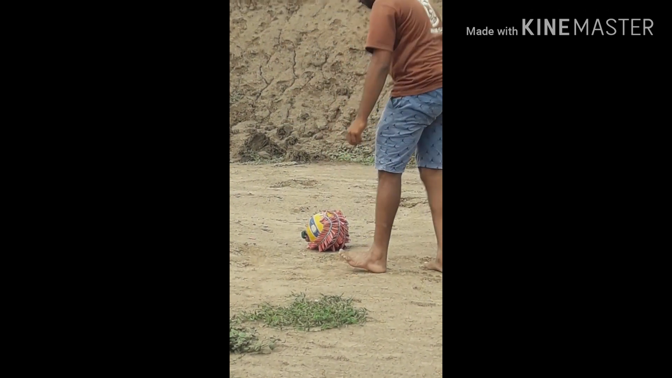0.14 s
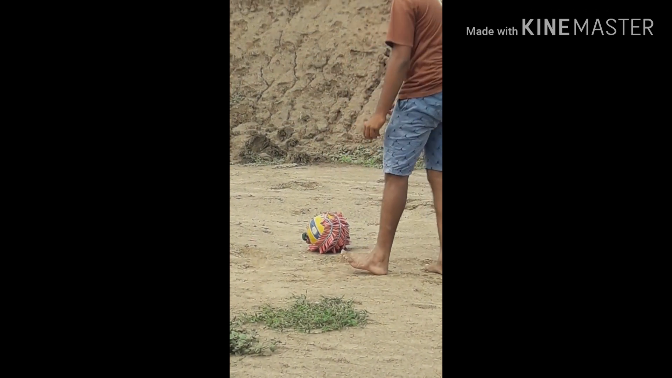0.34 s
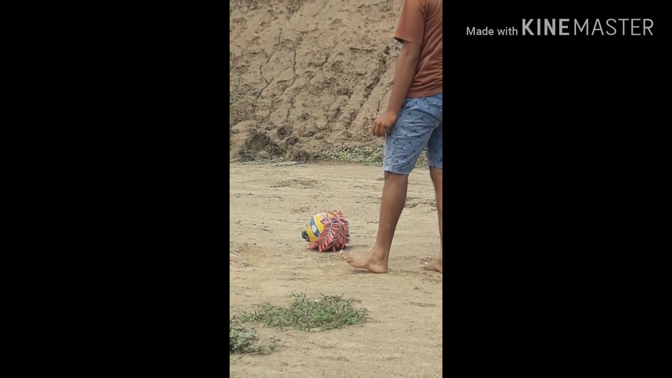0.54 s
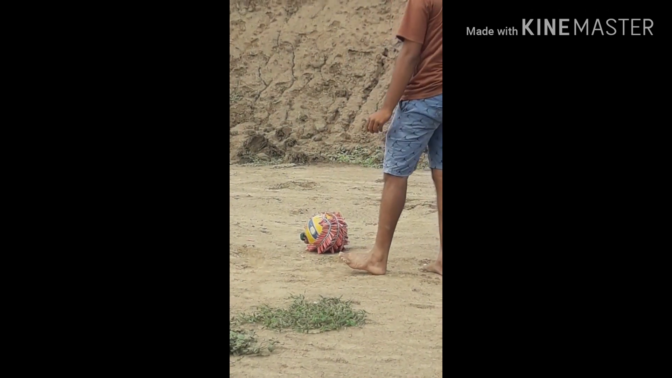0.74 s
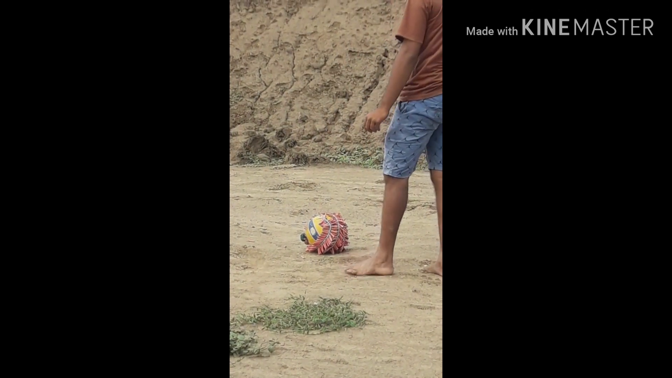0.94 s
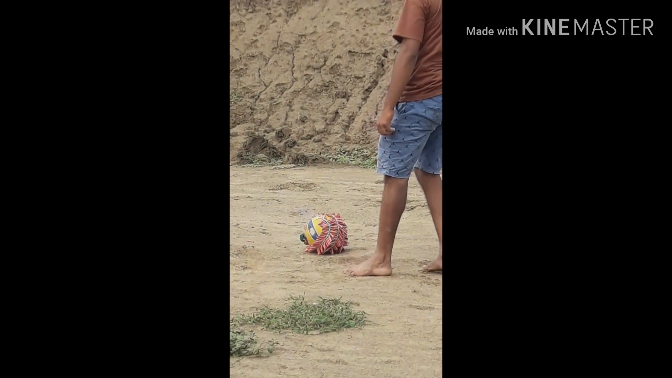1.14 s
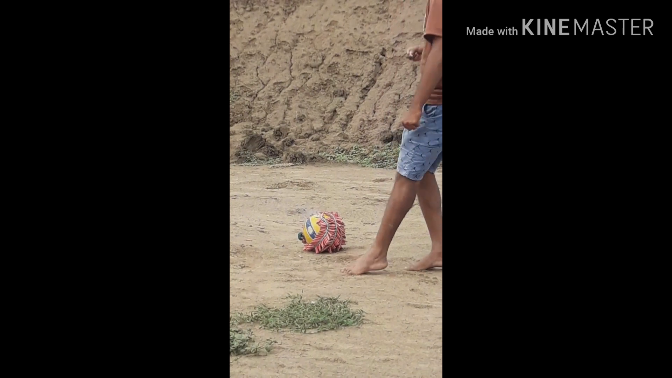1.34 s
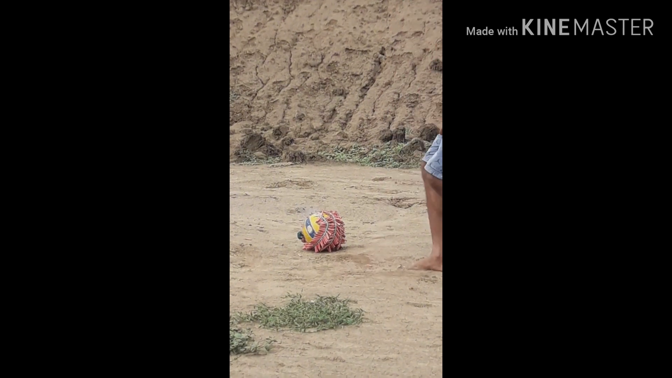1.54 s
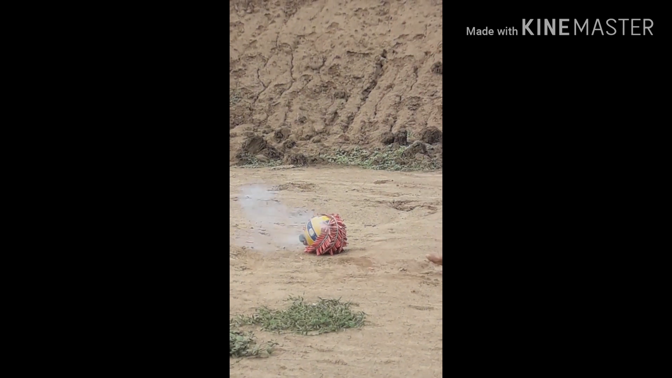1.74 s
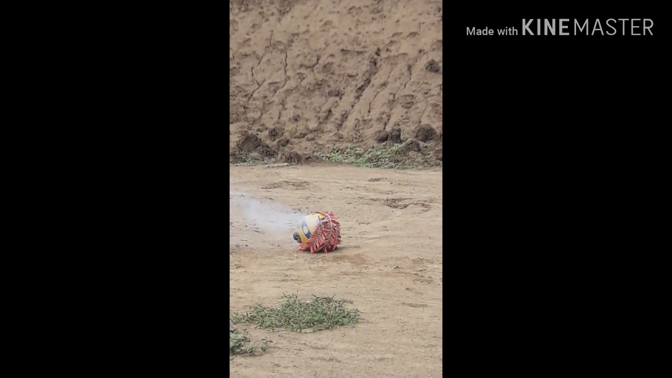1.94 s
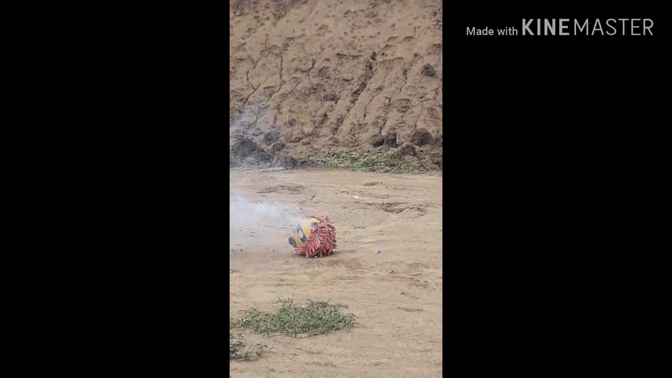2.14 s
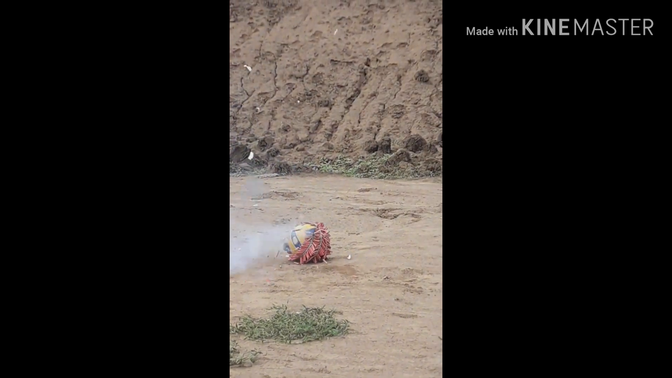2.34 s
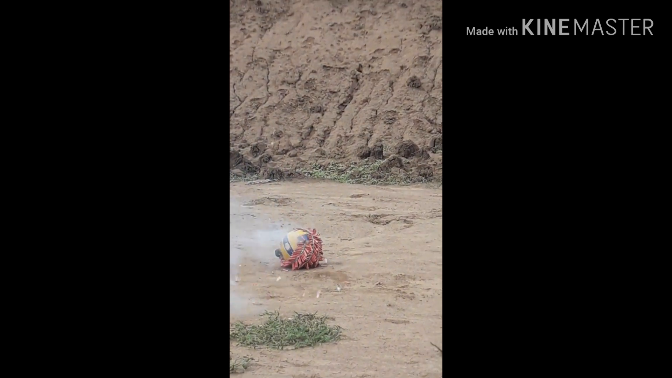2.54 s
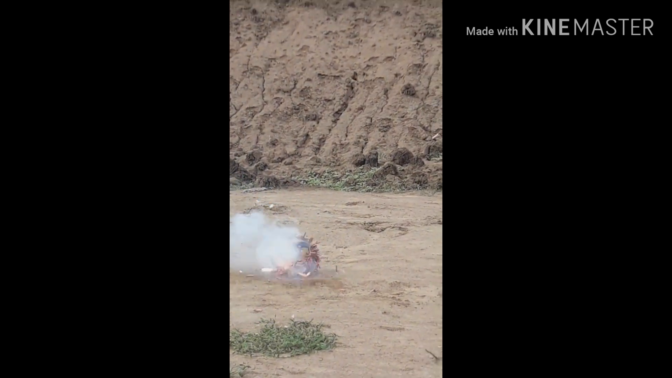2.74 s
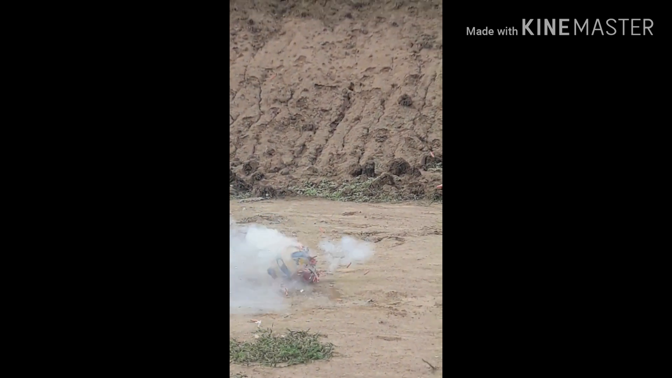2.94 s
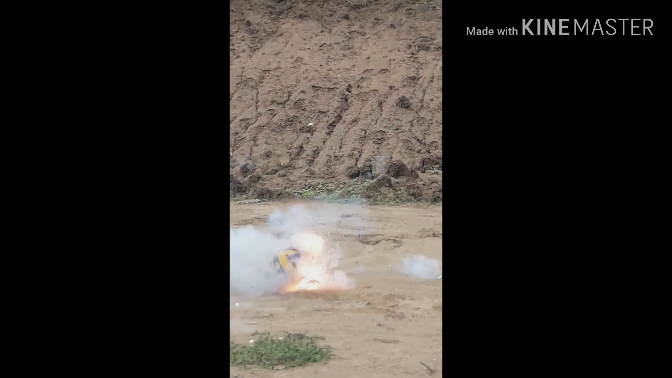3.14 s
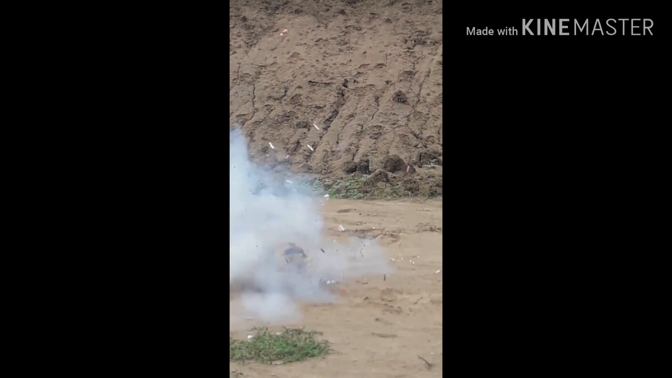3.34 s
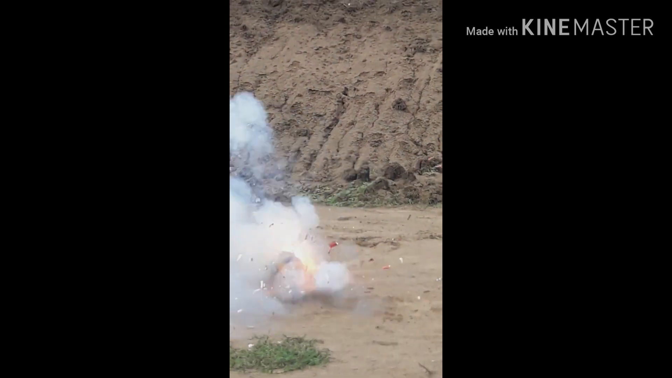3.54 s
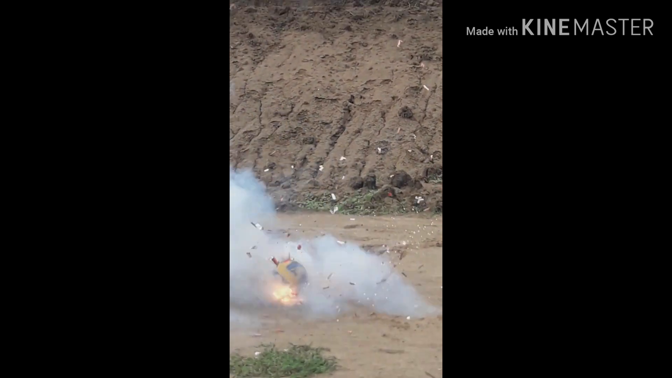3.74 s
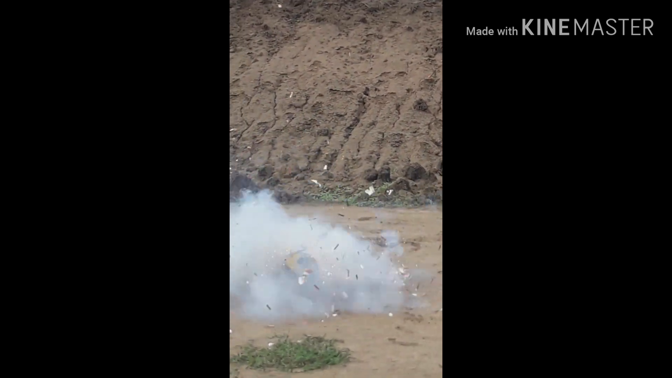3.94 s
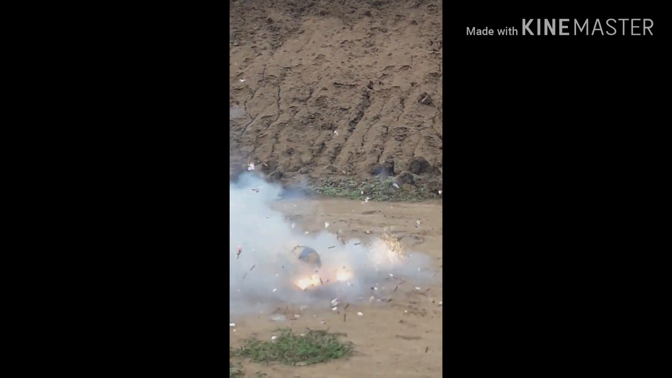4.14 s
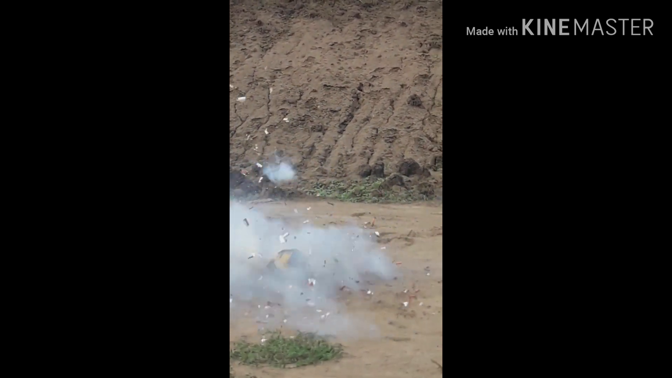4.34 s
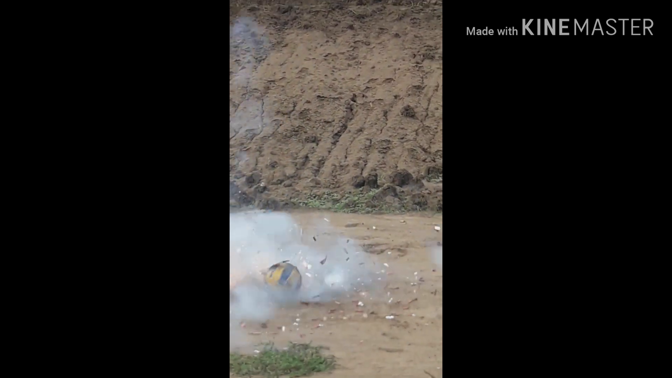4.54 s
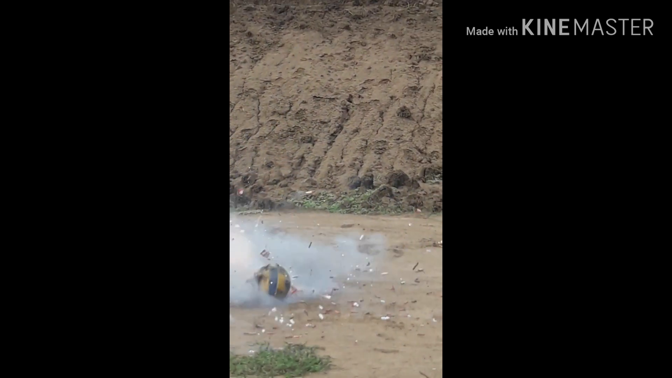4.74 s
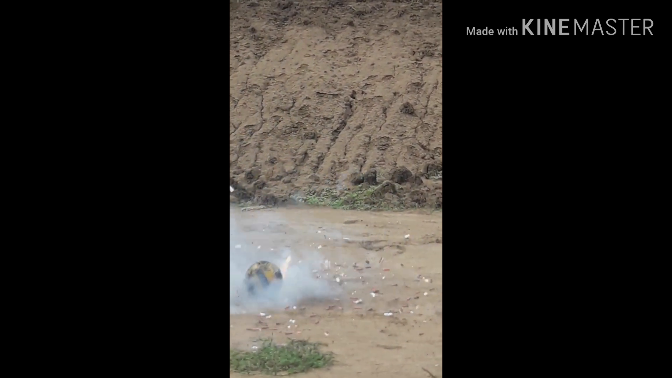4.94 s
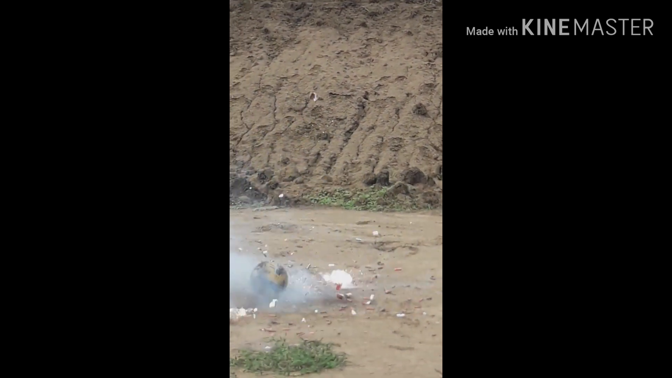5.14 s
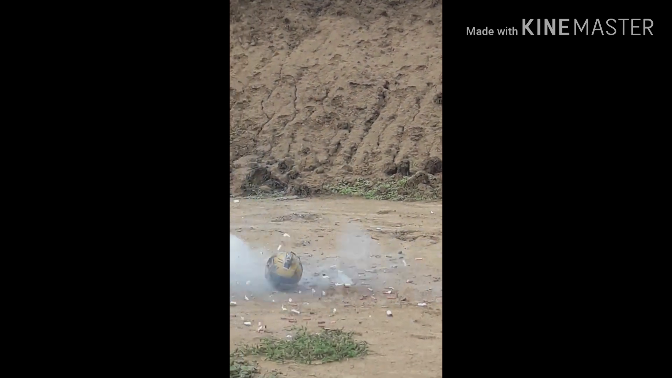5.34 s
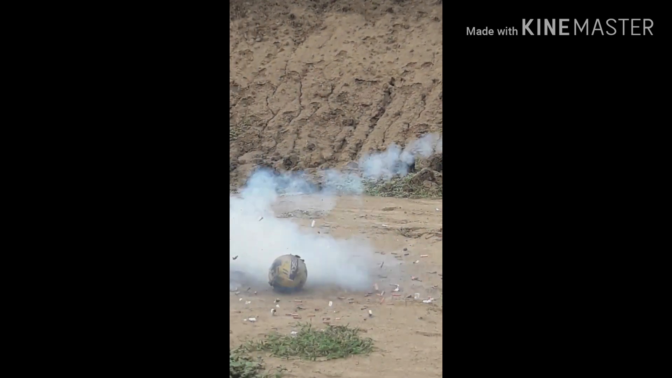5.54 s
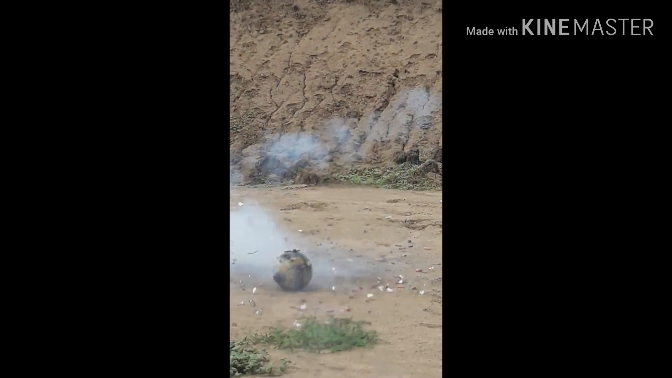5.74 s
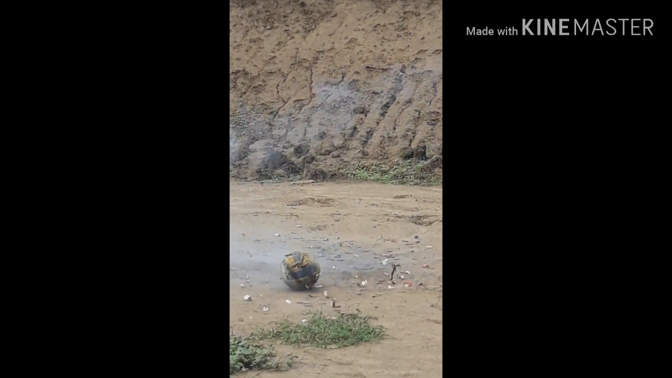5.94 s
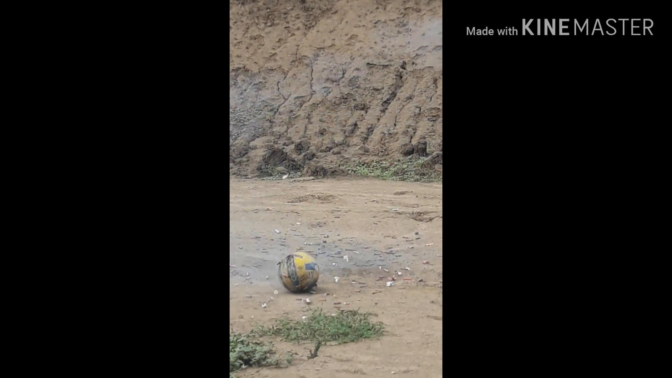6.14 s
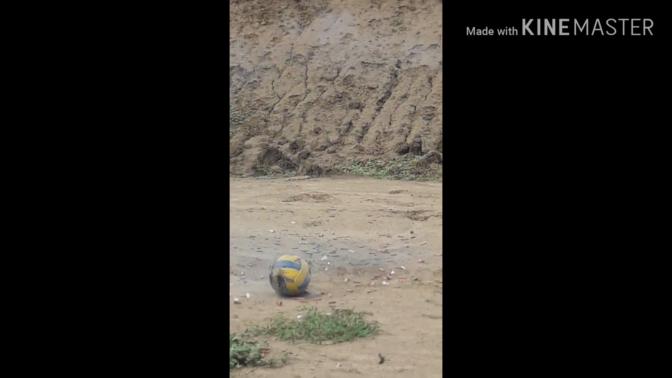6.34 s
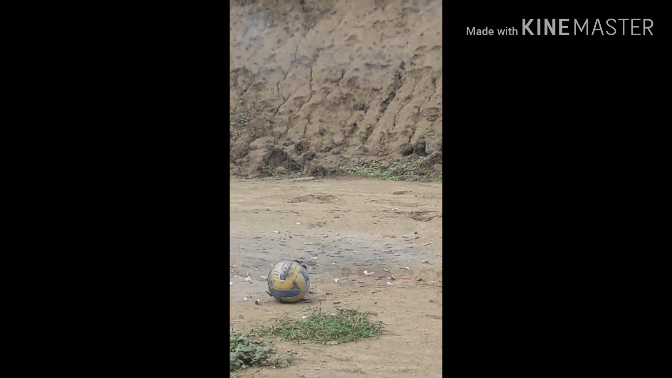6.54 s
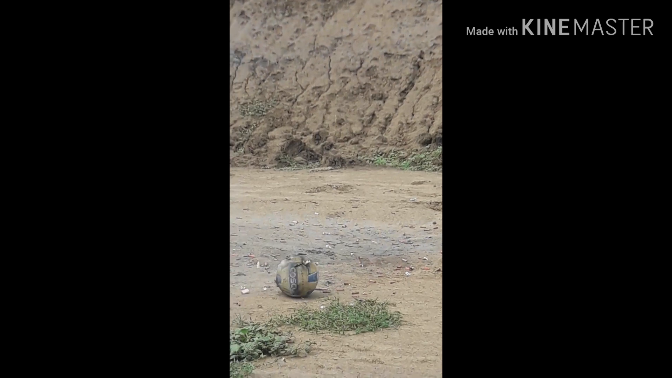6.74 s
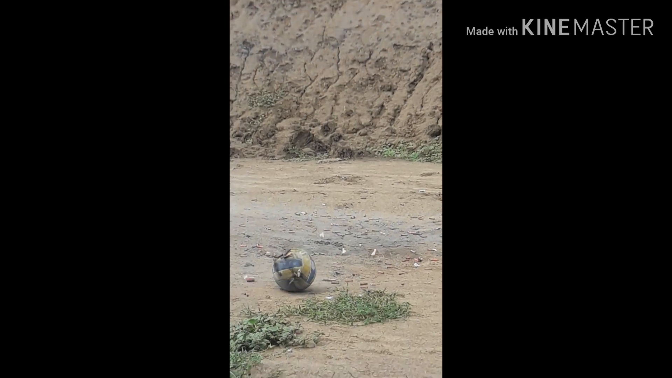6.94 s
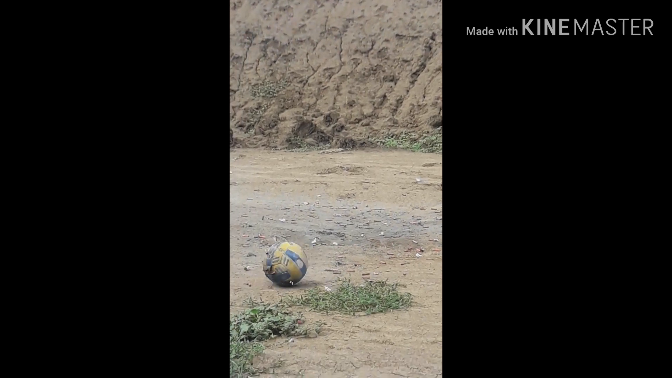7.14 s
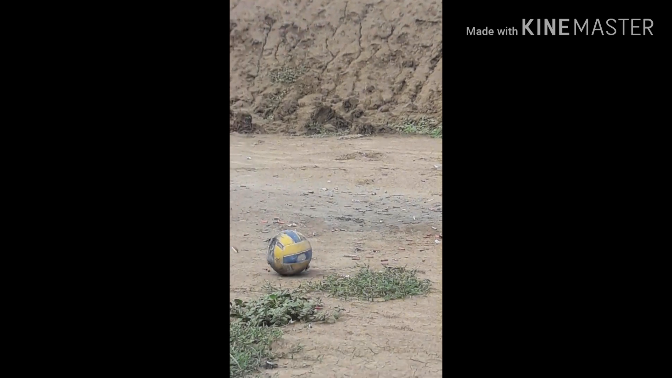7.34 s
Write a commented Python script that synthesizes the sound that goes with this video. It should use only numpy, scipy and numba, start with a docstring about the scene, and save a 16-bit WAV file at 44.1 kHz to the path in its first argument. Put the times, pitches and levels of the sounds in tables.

```python
"""Firecracker string below an earth bank

A string of small firecrackers wrapped round a ball burns off on bare ground, heard through a phone.
The fuse fizzes and pops, single bangs of ragged noise thicken into a crackle, a big bang comes at the end.
Loud bangs overload the phone; ground and slopes scatter each bang back as grainy, fading noise.
Gusty wind, noise under a wandering low-pass, rumbles throughout, with low thumps on the microphone.
"""
import sys
import numpy as np
from scipy import signal
from scipy.fft import rfft, irfft
from scipy.io import wavfile
from scipy.ndimage import uniform_filter1d
from numba import njit

SR = 44100
rng = np.random.default_rng(int(sys.argv[2]) if len(sys.argv) > 2 else 0)


def materialize(psi):
    """Save the field psi as 16-bit PCM at rate SR to the path in sys.argv[1].

    A 1-D psi becomes a single channel; in a 2-D psi each row is a channel.
    """
    bounded = np.clip(np.atleast_2d(psi).T, -1, 1)
    quanta = np.round(bounded * 32767).astype(np.int16)
    wavfile.write(sys.argv[1], SR, quanta)


N = 326309
TIME = np.arange(N) / SR

# low thumps on the microphone, each a swing with a wake of rumble: wind buffets, and a few low swings
# that follow bangs: [t/s, swing level/dB, wake level/dB]
THUMPS = [(.06, -1, -15), (0.171, -4, -27.5), (0.217, -4.5, -29.5), (0.2696, 3.5, -18.5),
          (0.425, -8.5, -19), (0.544, -19, -17), (.733, -16, -15.5), (.785, -6.5, -17.5),
          (.903, -5.5, -18.5), (1.09, -18, -19), (1.14, -10, -26), (1.193, -8.5, -20), (1.493, -3, -25.5),
          (1.599, -14, -22), (1.713, -15, -19.5), (1.8, -1, -11), (1.891, -4.5, -29.5), (2.201, -8, -35),
          (2.83, -5, -17), (3.05, -12.5, -16.5), (3.428, -8, -16), (4.45, -18, -11.5), (5.02, -8, -11.5),
          (5.456, 1, -7.5), (5.594, 8, -11), (5.623, 10, -9), (5.698, 6, -23.5), (5.772, 9, -4),
          (6.28, -1, -16.5), (6.334, -5, -18.5), (6.39, -3, -21.5), (6.483, -10, -14.5), (6.559, -4, -11),
          (6.739, -2, -26.5), (6.85, -3, -17.5), (6.875, -15, -13), (6.981, 2, -16.5), (7.046, -1.5, -32),
          (7.14, -7, -10), (7.28, -4, -30.5), (7.335, -6.5, -15.5)]
# the wind freshens once and its eddies get finer: upper edge before and after, middle and time scale
CALM_EDGE_HZ, FRESH_EDGE_HZ, FRESHENS_S, FRESHENING_S = 515, 980, 4.2, 0.38


def undb(db):
    """Turn decibels into an amplitude factor."""
    return 10 ** (np.asarray(db) / 20)


def unit(x):
    """Scale to rms 1."""
    return x / np.sqrt(np.mean(x ** 2))


def noise(size=N):
    """White noise."""
    return rng.standard_normal(size)


def curve(rows):
    """Join (t/s, value) rows by straight lines."""
    return np.interp(TIME, *np.transpose(rows))


def add(track, s, sound):
    """Mix a sound in at time s."""
    i = max(int(s * SR), 0)
    track[i:i + len(sound)] += sound[:N - i]


def colour(x, points, size=1024):
    """Filter causally (minimum phase) through (f/Hz, level/dB) points."""
    hz, db = np.transpose(points)
    f = np.maximum(np.fft.rfftfreq(size, 1 / SR), 1)
    level_db = np.interp(np.log(f), np.log(hz), db)
    # folding the cepstrum forward in time makes the filter causal
    cepstrum = irfft(np.log(undb(level_db)))
    cepstrum[1:size // 2] *= 2
    cepstrum[size // 2 + 1:] = 0
    response = irfft(np.exp(rfft(cepstrum)))
    return signal.fftconvolve(x, response)[:len(x)]


def butter(x, hz, kind, order=2):
    """Plain low- or high-pass."""
    b, a = signal.butter(order, min(hz, SR / 2 - 1), kind, fs=SR)
    return signal.lfilter(b, a, x)


@njit
def lowpass(x, hz):
    """Two-pole low-pass whose edge moves every sample."""
    y, band, low = np.empty(len(x)), 0., 0.
    for i in range(len(x)):
        g = np.tan(np.pi * min(hz[i], .4 * SR) / SR)
        v = (band + g * (x[i] - low)) / (1 + g * (g + 1.5))
        y[i] = low + g * v
        band, low = 2 * v - band, 2 * y[i] - low
    return y


def flutter(hz):
    """Smooth chance movement of rms 1, changing about hz times a second."""
    return unit(butter(noise(), hz, "low", order=3))


def eddy_edge(s):
    """Upper edge of the eddies in Hz: it rises smoothly as the wind freshens."""
    freshness = (1 + np.tanh((s - FRESHENS_S) / FRESHENING_S)) / 2
    return CALM_EDGE_HZ + (FRESH_EDGE_HZ - CALM_EDGE_HZ) * freshness


def rumble_level(waver_db=1.95, waver_hz=7, wake_rise_s=0.02, wake_fall_s=0.041):
    """Rumble level in dB: the wavering breeze, plus a quick swell and slower fall for each thump's wake."""
    # wind pressure on the microphone: [t/s, level/dB]
    breeze = [(0, -20), (.36, -28), (1.02, -27), (1.4, -21), (1.8, -15.5), (1.96, -23), (2.25, -18.5),
              (2.42, -29), (3.3, -26.5), (3.8, -39), (4.3, -22), (5.12, -22.5), (5.23, -10.5), (5.8, -21),
              (6.07, -16), (6.2, -25.5), (6.31, -11), (6.6, -17), (6.77, -19.5), (7.1, -17.5), (7.4, -21.5)]
    power = undb(curve(breeze) + waver_db * flutter(waver_hz)) ** 2
    for s, _, db in THUMPS:
        distance = np.maximum((s - TIME) / wake_rise_s, (TIME - s) / wake_fall_s)
        power = power + undb(db) ** 2 * np.exp(-2 * distance)
    return 10 * np.log10(power)


def wind(wind_db=0.0, flutter_db=6.0, edge_swing=0.3, body_hz=290, low_hz=88, eddy_hz=170,
         top_ratio=4.1, level_reach=0.04):
    """Eddies tumble over the microphone port: the stronger an eddy or the rumble, the higher it reaches."""
    level_db = rumble_level()
    # tanh holds the strongest eddies within 2.6 either way
    eddies = 2.6 * np.tanh(unit(flutter(eddy_hz) + .5 * flutter(24)) / 2.6)
    pressure = butter(noise(), body_hz, "low", order=1)
    pressure = butter(pressure, low_hz, "high")

    reach = edge_swing * eddies + level_reach * (level_db - level_db.mean())
    edge = eddy_edge(TIME) * np.exp(reach)
    rumble = lowpass(pressure * undb(flutter_db * eddies), edge)
    rumble = lowpass(rumble, edge)
    rumble = lowpass(rumble, top_ratio * edge)

    # level out the slow strength, so that the rumble level alone sets it
    power = uniform_filter1d(rumble ** 2, size=1500)
    power = uniform_filter1d(power, size=1500)
    return rumble / np.sqrt(power) * undb(level_db + wind_db)


def thumps(thump_db=0, pitch_ratio=0.55, reach_ratio=3.2, size=1800):
    """Each thump swings the microphone by a push and a suction, steeper once the wind has freshened."""
    out = np.zeros(N)
    t = (np.arange(size) - size // 2) / SR
    for s, db, _ in THUMPS:
        hz = pitch_ratio * eddy_edge(s)
        pulse = np.exp(1j * np.pi / 3) / (1 - 2j * np.pi * hz * t) ** 2
        swing = np.real(pulse) * np.hanning(size)
        add(out, s + t[0], undb(db + thump_db) * swing)
    return lowpass(out, reach_ratio * eddy_edge(TIME))


def fuse(sputter_db=6.0, air_hiss_db=-80.5):
    """The burning fuse is sputtering hiss, over the faint steady hiss of the open air."""
    # the fuse flares as it reaches the string; the remains smoulder at the end: [t/s, level/dB]
    fuse_level = [(0, -102), (.9, -77), (1.3, -84), (1.6, -79), (1.755, -43), (1.9, -53.5), (2.2, -80),
                  (5.85, -80), (7.4, -75)]
    # colour of the hiss: [f/Hz, level/dB]
    hiss_colour = [(1000, -13.5), (2500, -16), (3100, -15), (3900, -1.5), (4500, -11), (5900, -12),
                   (8500, -25), (14000, -22)]
    hiss = unit(colour(noise(), hiss_colour))
    burning = undb(curve(fuse_level) + sputter_db * flutter(21))
    return hiss * (burning + undb(air_hiss_db))


def charges(chain_from_s=3.2, chain_to_s=5.25, chain_chance=.15, chain_lag_s=0.01,
            chain_db=-9.5, chain_spread_db=5, bright_hz=2350, bright_oct_per_db=.016, bright_spread_oct=0.083):
    """All blasts as (t/s, strength/dB, brightness/Hz): stronger ones brighter, some setting off a neighbour."""
    # the distinct bangs, loud and weak, after a first pop of the flaring fuse: [t/s, blast strength/dB]
    bangs = [(1.7431, -4.5), (2.0884, 2.5), (2.2841, -4.5), (2.3074, -6.5), (2.317, 6), (2.4846, -4),
             (2.5165, 5.5), (2.6683, 4.5), (2.8082, 6.5), (2.8189, -11), (2.855, -0.5), (2.8703, -5.5),
             (2.88, -10.5), (2.9554, -3), (2.9721, -10.5), (2.9962, 5.5), (3.0391, 1.5), (3.1509, -0.5),
             (3.1743, 2.5), (3.2166, -4), (3.237, -9.5), (3.248, -5), (3.273, 1.5), (3.276, 5), (3.2931, 7),
             (3.3, 0), (3.3143, -10.5), (3.353, 7.5), (3.3695, -1.5), (3.3919, -3), (3.4286, -6),
             (3.4537, -3), (3.4697, -7.5), (3.486, 6), (3.5278, -2), (3.5533, -3.5), (3.567, -14.5),
             (3.5728, -8), (3.5843, -6), (3.6024, -7), (3.6089, 3.5), (3.616, 4.5), (3.641, 3),
             (3.6556, 0.5), (3.6964, 8.5), (3.7098, 1), (3.7176, 2), (3.723, -1.5), (3.742, 0), (3.7541, 7),
             (3.7614, -1), (3.7738, 3.5), (3.781, -7), (3.7877, -3), (3.7967, 2.5), (3.8308, -8),
             (3.8365, -3.5), (3.8451, -3), (3.8577, -12.5), (3.866, -7), (3.877, 0), (3.8931, 3.5),
             (3.9013, -3), (3.9174, 0.5), (3.9248, 2.5), (3.9377, -10.5), (3.961, 0), (3.98, 2),
             (3.985, 3.5), (4.0111, -2), (4.0249, 0), (4.0514, 4.5), (4.0608, 7.5), (4.094, 3.5),
             (4.1083, -2), (4.131, -6.5), (4.1374, -7), (4.161, -.5), (4.171, -5.5), (4.1795, -10),
             (4.2023, -5), (4.2072, 9), (4.215, -3.5), (4.2335, 3), (4.2416, 11), (4.2527, 3),
             (4.2632, 1.5), (4.3078, 3.5), (4.3276, -6), (4.341, 1), (4.3517, -1.5), (4.3654, 1),
             (4.3817, 1.5), (4.401, 4.5), (4.414, -12), (4.4189, 0), (4.452, -0.5), (4.459, 3), (4.4724, 0),
             (4.4863, -0.5), (4.502, -6.5), (4.513, -9), (4.557, 1), (4.5907, -1), (4.6069, -4.5),
             (4.62, -5.5), (4.6277, 6), (4.631, -4), (4.6467, -1), (4.6758, 7), (4.689, -11.5),
             (4.7044, -8), (4.7329, -2.5), (4.7384, 3.5), (4.7591, 4.5), (4.7833, -8), (4.802, 2.5),
             (4.8575, -3.5), (4.8692, -4.5), (4.8878, -11), (4.9076, -13), (4.9181, -8), (4.9309, 5),
             (4.9438, -14.5), (4.9898, -1), (5.0171, -8.5), (5.0316, -10), (5.041, -14.5), (5.0716, -0.5),
             (5.0954, -6.5), (5.1121, -2), (5.118, 0.5), (5.17, -12), (5.1845, 3.5), (5.2127, -8.5),
             (5.222, -2), (5.23, -2.5), (5.2393, 3), (5.2797, 2.5), (5.2997, -5), (5.3177, -5),
             (5.345, -7.5), (5.4999, -0.5), (5.5623, -3), (5.8525, 18), (5.885, -6.5)]
    blasts = []
    for s, db in bangs:
        luck, z = rng.random(), rng.standard_normal(4)
        blasts.append((s, db, z[0]))
        # while the string burns fastest, a bang may set off a weak neighbour a moment later
        if chain_from_s < s < chain_to_s and luck < chain_chance:
            lag = chain_lag_s * np.exp(0.28 * z[1])
            blasts.append((s + lag, chain_db + chain_spread_db * z[2], z[3]))

    def brightness(db, z):
        return bright_hz * 2 ** (bright_oct_per_db * db + bright_spread_oct * z)

    return [(s, db, brightness(db, z)) for s, db, z in blasts]


def firecrackers(blasts, crack_db=6.5, push_db=-3, burst_s=0.0027, rattle_db=-13, rattle_s=0.005,
                 push_s=.0018, growth=0.014, steepening=2.0, push_spread_db=3.5):
    """Each blast is a pressure push and suction, a ragged crack, and a rattle off the nearby ground."""
    # colour of the crack, with the resonances of the microphone port: [f/Hz, level/dB]
    crack_colour = [(100, -16), (350, -1.5), (700, -7), (1120, -6), (1380, -1), (1600, -3), (1860, 0),
                    (2600, -3), (3100, -5.5), (3750, -2), (5000, -9), (6900, -2), (7800, -11), (15000, -4)]
    cracks, pushes = np.zeros(N), np.zeros(N)
    t = np.arange(SR // 10) / SR
    for s, db, hz in blasts:
        age = t / np.exp(growth * db)  # stronger blasts last longer
        burst = np.exp(-(age / burst_s) ** 4)
        rattle = undb(rattle_db) * np.exp(-age / rattle_s)
        ragged = butter(noise(len(t)), 2800 * (hz / 2000) ** steepening, "low")
        # give the noise rms 1 under the burst
        ragged *= np.linalg.norm(burst) / np.linalg.norm(ragged * burst)
        add(cracks, s, undb(db + crack_db) * ragged * (burst + rattle))

        # the microphone swings one way, then back, and settles
        half_swing_s = push_s * rng.uniform(0.745, 1.63)
        swing = -np.sin(np.pi * age / half_swing_s) * np.exp(-age / 0.0031)
        # the push grows far less with strength than the crack does
        level_db = push_db + 0.1 * db + push_spread_db * rng.standard_normal()
        add(pushes, s, undb(level_db) * swing)
    return colour(cracks, crack_colour) + pushes


def terrain(blasts, near_db=-20.5, near_t60=0.089, far_db=-33, far_t60=0.55, treble_t60=.43,
            grain_db=2.5, carry=1.287, treble_db_per_s=-9, split_hz=7500):
    """Rough ground and slopes scatter each blast back as grainy noise, whose treble fades sooner."""
    # echoes from the earth bank and slopes further off: [delay/s, spread/s, level/dB]
    echoes = [(0.046, 0.0063, -39.5), (0.068, 0.025, -48.5), (.205, 0.031, -47.5), (.33, .04, -60),
              (.73, 0.069, -60)]
    # colour of the sound scattered by the ground close by: [f/Hz, level/dB]
    ground_colour = [(100, 0), (350, 3.5), (560, 0.5), (1000, 7.5), (1800, 1.5), (2800, -6), (3700, -10.5),
                     (4800, -10.5), (6700, -16), (8200, -19.5), (14000, -20.5)]
    # colour of the sound scattered by the terrain further off: [f/Hz, level/dB]
    far_colour = [(100, 1.5), (400, 5.5), (1000, -2), (1900, -3), (2800, -5.5), (3700, -3.5), (4800, -10.5),
                  (6700, -10), (8200, -19), (14000, -26.5)]
    t = np.arange(SR * 3 // 2) / SR
    energy = np.zeros(N)
    for s, db, _ in blasts:
        energy[int(s * SR)] += undb(carry * db) ** 2
    slopes = sum(undb(db) * np.exp(-((t - delay) / spread) ** 2) for delay, spread, db in echoes)

    def fading(db, t60):
        return undb(db - 60 * t / t60)

    def scattered(response, points):
        # returns from many surfaces are unrelated, so their powers add
        power = np.abs(signal.fftconvolve(energy, response ** 2)[:N])
        return np.sqrt(power) * unit(colour(noise(), points))

    near = scattered(fading(near_db, near_t60), ground_colour)
    body = scattered(np.hypot(fading(far_db, far_t60), slopes), far_colour)
    body = butter(body, split_hz, "low", order=4)
    dulled_slopes = slopes * undb(treble_db_per_s * t)
    treble = scattered(np.hypot(fading(far_db, treble_t60), dulled_slopes), far_colour)
    treble = butter(treble, split_hz, "high", order=4)
    grain = undb(grain_db * (flutter(190) + flutter(32)))
    return grain * (near + body + treble)


def scene(port_limit=0.89):
    """Bangs and their echoes over the fuse, the wind and the thumps; the narrow port rounds off the last two."""
    low_end = port_limit * np.tanh((wind() + thumps()) / port_limit)
    air = low_end + fuse()
    blasts = charges()
    return (air + terrain(blasts) + firecrackers(blasts))[None]


def record(dry, ceiling=0.98):
    """The phone clips loud peaks with a short knee, thins the deep bass, dips near 9 kHz and cuts the top."""
    # the phone's tone after its overload: [f/Hz, level/dB]
    phone_colour = [(25, -11.5), (50, -9.5), (80, 2.84), (7000, -3.5), (9000, -8.5), (12000, -3),
                    (15000, -2)]
    clipped = dry[0] / (1 + (dry[0] / ceiling) ** 16) ** (1 / 16)
    toned = colour(clipped, phone_colour, size=4096)
    top_cut = signal.ellip(8, .1, 60, 15700, fs=SR, output="sos")  # edge in Hz
    return signal.sosfiltfilt(top_cut, toned)[None]


dry = scene()
out = record(dry)
materialize(out)
```